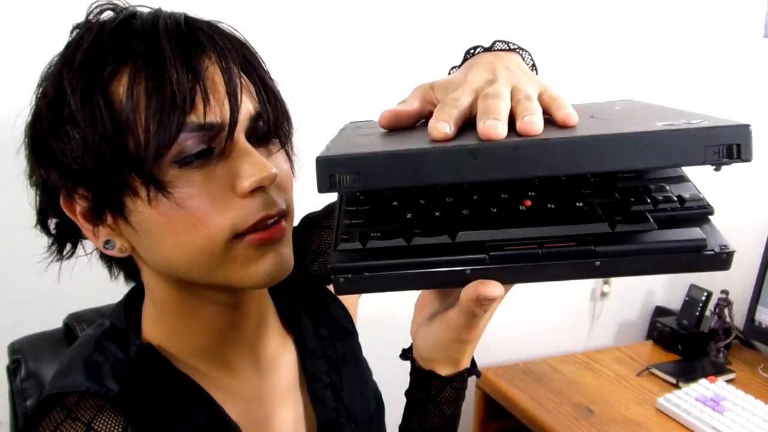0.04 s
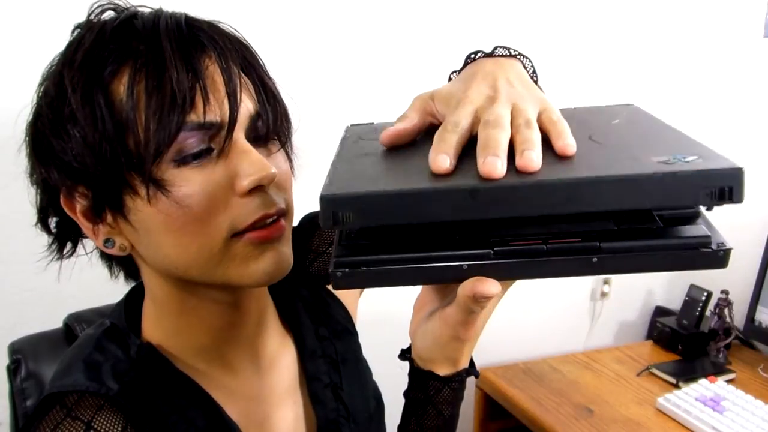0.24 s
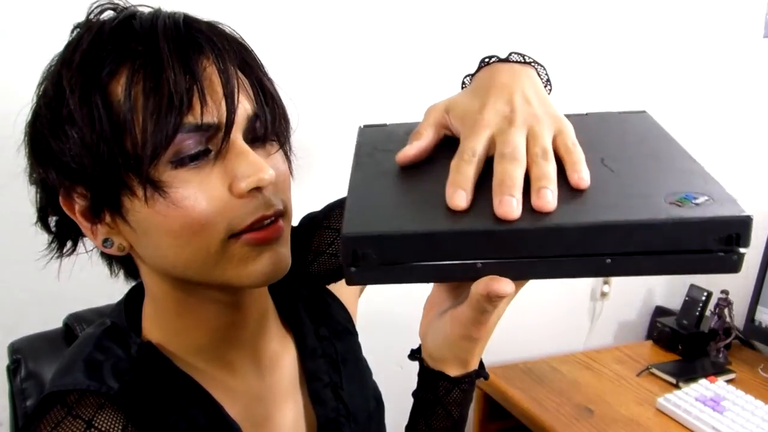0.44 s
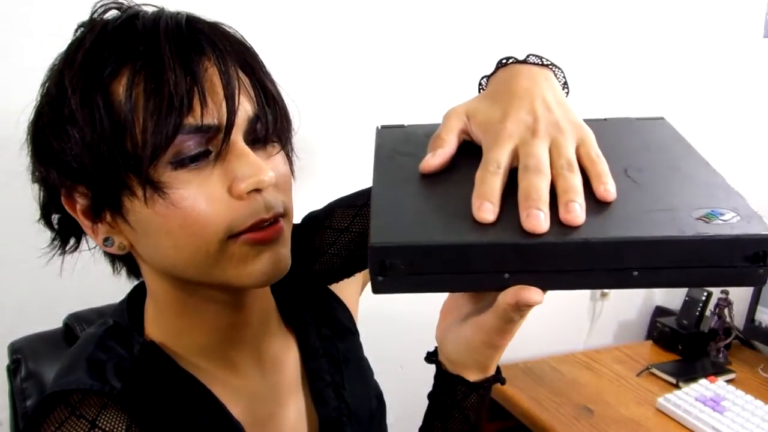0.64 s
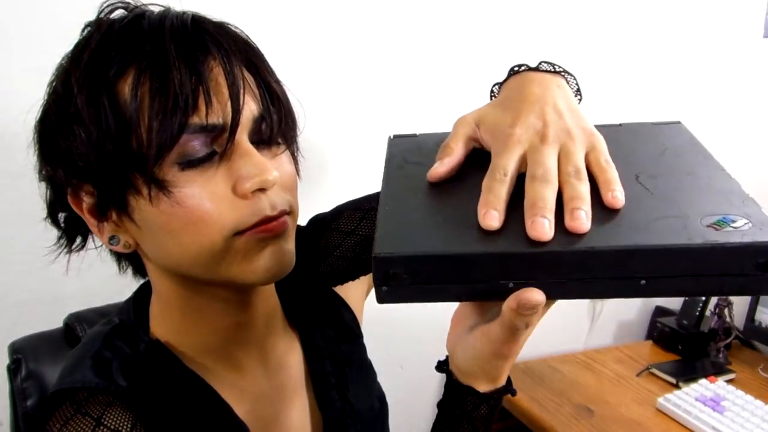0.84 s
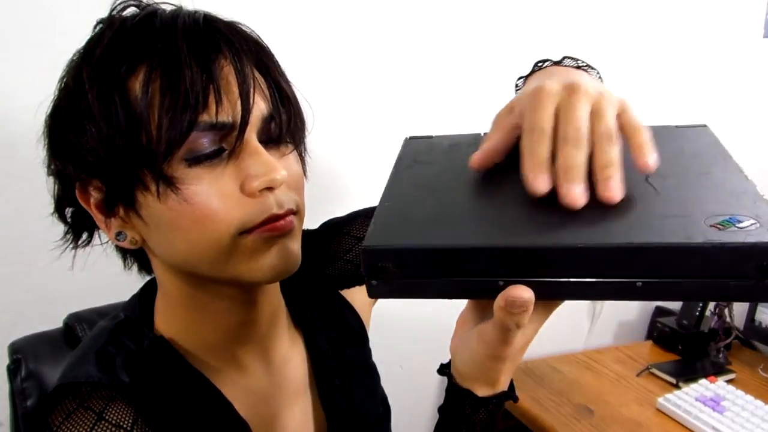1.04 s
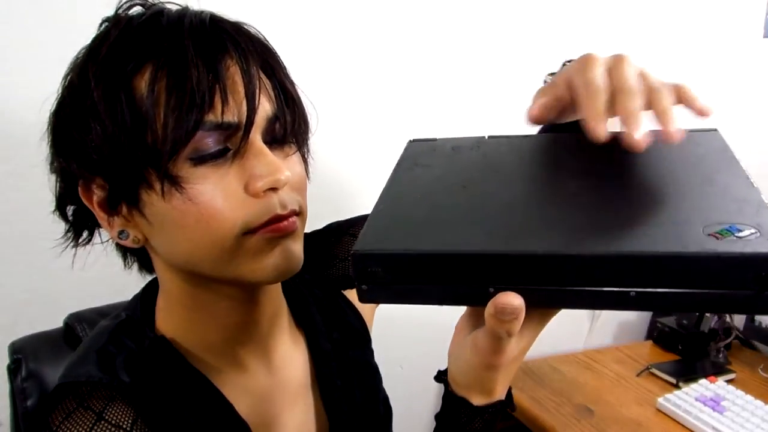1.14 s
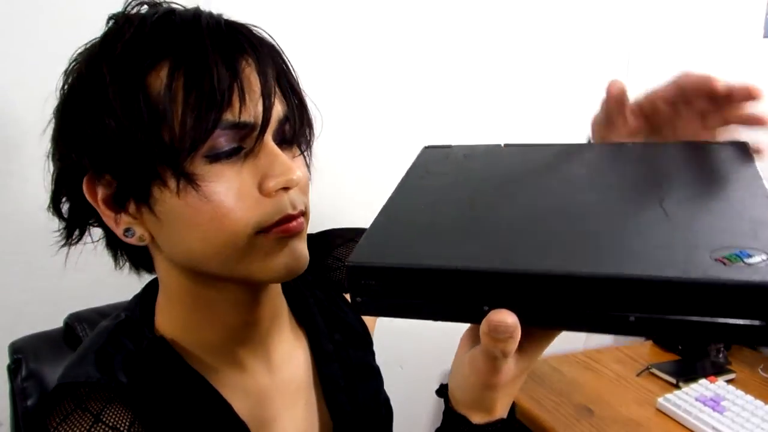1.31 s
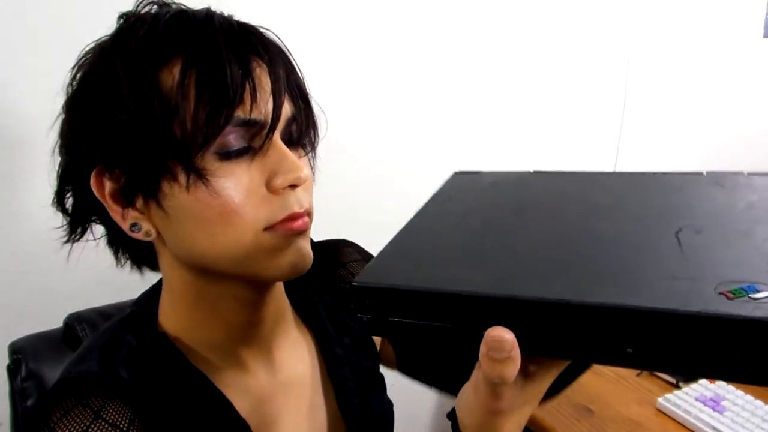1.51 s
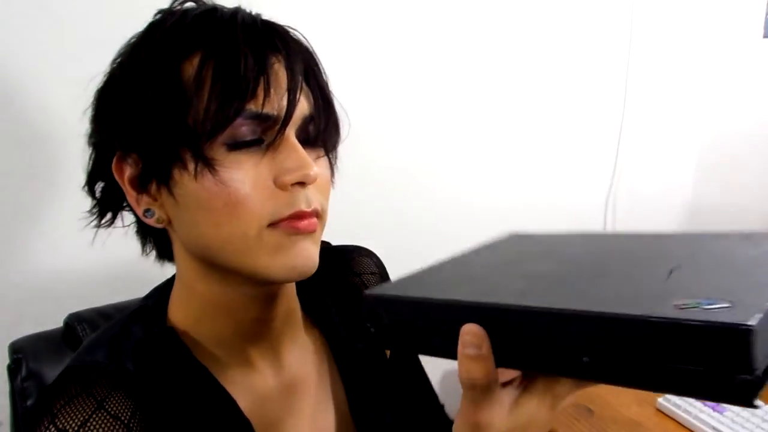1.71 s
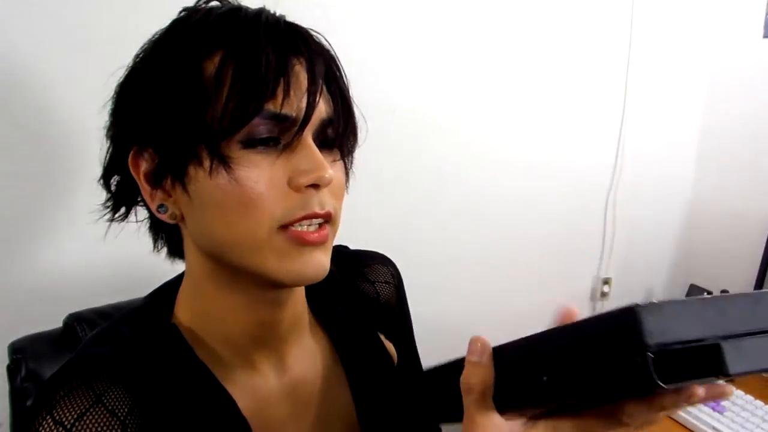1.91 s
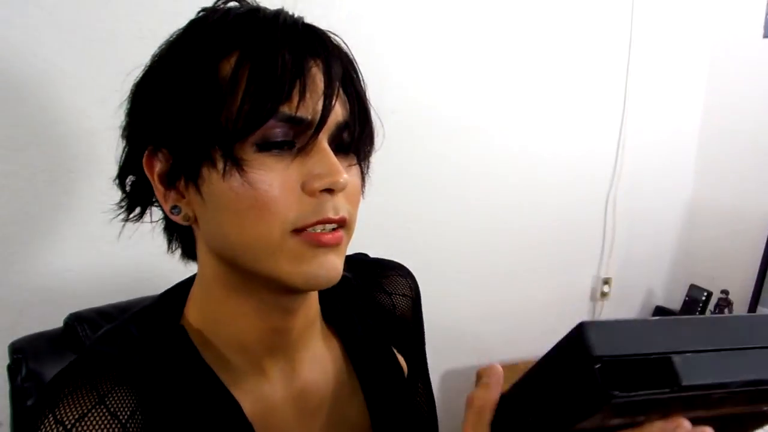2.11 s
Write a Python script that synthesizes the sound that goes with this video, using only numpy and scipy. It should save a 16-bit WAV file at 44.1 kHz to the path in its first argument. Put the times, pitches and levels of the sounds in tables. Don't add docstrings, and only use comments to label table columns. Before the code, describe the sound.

An old laptop closes close to the microphone: a soft plastic slide, three hard clusters of latch clicks, then quiet creaks, small knocks and a loose rattle as it is lowered in a small bare room.

```python
import sys
import numpy as np
from scipy import signal
from scipy.fft import rfft, irfft
from scipy.io import wavfile

SR = 44100
rng = np.random.default_rng(int(sys.argv[2]) if len(sys.argv) > 2 else 0)


def natural_amplitude(level_db):
    exponent = np.asarray(level_db, float) / 20
    return 10 ** exponent


def unload_audio(sound):
    columns = np.transpose(np.atleast_2d(sound))
    steps = np.round(np.clip(columns, -1, 1) * 32767)
    wavfile.write(sys.argv[1], SR, steps.astype(np.int16))


N = 94991

# frequency in Hz, level in dB, t60 in seconds.
SHELL = [(858, 1.5, 0.016), (1022, -4.5, 0.033), (1030, -3.5, 0.025), (1130, -2.5, 0.026),
         (1171.4, 1.5, 0.013), (1258, 3, 0.018), (1306, -6, 0.003), (1590, -10, 0.0067), (1797, -8, .012),
         (1922, -12, 0.0078), (1970, -7, 0.0053), (2316, -8.5, 0.0095), (2720, -7.5, 0.006),
         (3056, -10, 0.0091)]
# frequency in Hz, level in dB, t60 in seconds.
PANEL = [(306.8, -24, 0.079), (507.6, -18.5, 0.0042), (577, -2, 0.12), (623, 0, 0.04), (705, 3.5, 0.026),
         (743, -8.5, 0.011)]
# frequency in Hz, level in dB per Hz.
FLOOR = [(59, -36), (100, -6.5), (260, -6), (1170, -8.5), (2000, -11), (3050, -10.5), (4020, -15),
         (6560, -13), (16000, -14)]
SHELL_LOW_HZ, PANEL_LOW_HZ = 856, 407


def rms_one(x):
    return x / np.sqrt(np.mean(x ** 2) + 1e-20)


def in_time(rows):
    s, db = np.transpose(rows)
    after_db = db[-1] if s[-1] > 2.1 else -120
    return natural_amplitude(np.interp(np.arange(N) / SR, s, db, left=-120, right=after_db))


def at_hz(points, hz, column=1):
    points = np.array(points)
    return np.interp(np.log(hz + 1), np.log(points[:, 0]), points[:, column])


def shape(spectrum, size):
    hz = np.arange(size // 2 + 1) * SR / size
    inside = (hz > .7 * spectrum[0][0]) * (hz < 1.3 * spectrum[-1][0])
    return natural_amplitude(at_hz(spectrum, hz)) * inside


def coloured(spectrum):
    return rms_one(irfft(rfft(rng.standard_normal(N)) * shape(spectrum, N), N))


def wide(spectrum, side_db):
    return coloured(spectrum) + natural_amplitude(side_db) * coloured(spectrum) * [[1], [-1]]


def lumpy(rate, spread_db):
    knots = rng.standard_normal(400)
    return natural_amplitude(spread_db * np.interp(np.arange(N) / SR * rate, np.arange(400), knots))


def impulses(s, db):
    clicks = np.full(N, 1e-18)
    clicks[(np.array(s) * SR).astype(int)] = natural_amplitude(db)
    return clicks


def struck(modes, s, db, scatter_db):
    out = np.zeros(N)
    draw = rng.standard_normal((len(s), len(modes)))
    for k, (hz, level_db, t60) in enumerate(modes):
        clicks = impulses(s, np.array(db) + level_db + scatter_db * draw[:, k])
        r = natural_amplitude(-60 / (t60 * SR))
        w = 2 * np.pi * hz / SR
        out += signal.lfilter([0, np.sin(w)], [1, -2 * r * np.cos(w), r * r], clicks)
    return out


def radiated(x, low_hz):
    too_small = signal.butter(4, low_hz, "high", fs=SR, output="sos")
    soft_contact = signal.butter(2, 2800, fs=SR, output="sos")
    return signal.sosfilt(np.vstack([too_small, soft_contact]), x)


def burst(spectrum, s, db, t60, side_db=-28):
    clicks = impulses(s, db)
    decay = signal.lfilter([1], [1, -natural_amplitude(-60 / (t60 * SR))], clicks)
    send = irfft(rfft(clicks) * rms_one(shape(spectrum, N)), N)
    return wide(spectrum, side_db) * decay, send


def quiet_floor():
    return natural_amplitude(-70) * wide(FLOOR, side_db=-8.5)


def rumble():
    # time in seconds, level in dB.
    air_level = [(0, -62), (.12, -68), (.38, -72), (.47, -54), (.54, -43.5), (.61, -63.5), (.87, -67),
                 (1.09, -77.5), (1.29, -80), (1.75, -70.5), (1.95, -54.5), (2.0, -53), (2.08, -50.5),
                 (2.15, -54.5)]
    # frequency in Hz, level in dB per Hz.
    air_colour = [(12, -26), (20, 3.5), (39, -13), (146, -20.5), (194, -26.5), (250, -23.5), (320, -59),
                  (550, -120)]
    return in_time(air_level) * wide(air_colour, side_db=-26) * lumpy(15, 2.5)


def room(x):
    # frequency in Hz, t60 in seconds, level in dB, side level in dB.
    tail_bands = [(200, 0.083, -14, -26), (535, 0.26, -8.5, -39.5), (860, 0.21, -5, -43.5),
                  (1080, 0.33, -6, -39.5), (1300, 0.43, -3.5, -39), (1800, .27, -3, -28.5),
                  (2500, 0.26, 1, -21), (4926, 0.41, -2.5, -15), (9100, 0.32, -5, -14.5),
                  (14820, 0.17, -0.5, -18)]
    delay_s, early_db, early_t60_s = 0.0019, 0.5, 0.059
    knee_s, drop_db_per_s = 0.11, 118
    size = SR // 2
    t, tail = np.arange(size) / SR, 0
    edges = 125 * 2 ** np.arange(0, 7.1, 1 / 3)
    for low, high in zip(edges, edges[1:]):
        hz = np.sqrt(low * high)
        sos = signal.butter(2, [low, high], "band", fs=SR, output="sos")
        band = signal.sosfilt(sos, rng.standard_normal((2, size)))
        late = natural_amplitude(-60 * t / at_hz(tail_bands, hz))
        early = natural_amplitude(early_db - 60 * t / early_t60_s)
        level = natural_amplitude(at_hz(tail_bands, hz, column=2))
        side = natural_amplitude(at_hz(tail_bands, hz, column=3))
        tail = tail + band * (late + early) * level * [[1], [side]]
    onset = np.clip(t / delay_s, 0, 1) ** 2
    tail = tail * onset * natural_amplitude(-30 - drop_db_per_s * np.clip(t - knee_s, 0, 1))
    mid, side = signal.fftconvolve(x[None], tail, axes=1)[:, :N]
    return mid + side * [[1], [-1]]


def moving_room(x):
    moves_s = [0, .7, .95, 1.5, 9]
    t = np.arange(N) / SR
    return sum(room(x * (t >= a) * (t < b)) for a, b in zip(moves_s, moves_s[1:]))


def keyboard_slide():
    # time in seconds, level in dB.
    slide_level = [(0, -65.5), (.04, -77), (.08, -71.5), (.125, -58.5), (.15, -58), (.205, -49.5),
                   (.232, -56), (.28, -61), (.36, -77)]
    # frequency in Hz, level in dB per Hz.
    slide_colour = [(450, -19), (1050, 2), (1550, -6.5), (2020, -3.5), (2800, -13), (3500, -8),
                    (4700, -12.5), (5300, -24)]
    return in_time(slide_level) * coloured(slide_colour) * lumpy(70, 1.5)


def latch_drag():
    # time in seconds, level in dB.
    drag_level = [(.66, -72), (.71, -55), (.735, -56), (.744, -44), (.747, -89.5), (.86, -79.5),
                  (.92, -57.5), (.97, -55.5), (.975, -90)]
    return in_time(drag_level) * coloured(FLOOR[2:])


def hand_rub():
    # time in seconds, level in dB.
    rub_level = [(.38, -69), (.5, -57), (.56, -86.5), (1.55, -86.5), (1.62, -71.5), (1.7, -70.5),
                 (1.785, -61), (1.8, -61), (1.87, -50.5), (1.9, -54.5), (1.95, -46.5), (2.03, -49),
                 (2.08, -55), (2.15, -50)]
    # frequency in Hz, level in dB per Hz.
    rub_colour = [(120, -47.5), (200, -22), (683, 3), (791, -11), (1120, 2), (1560, -6), (6170, -12),
                  (8270, -11.5), (16000, -18.5)]
    return in_time(rub_level) * coloured(rub_colour) * lumpy(90, 2.2)


def finger_rustle():
    # time in seconds, level in dB.
    rustle_level = [(1.56, -85), (1.615, -71.5), (1.625, -66), (1.66, -72), (1.7, -85)]
    # frequency in Hz, level in dB per Hz.
    rustle_colour = [(1000, -12), (1300, 0), (2100, 0), (2600, -14.5)]
    return in_time(rustle_level) * coloured(rustle_colour) * lumpy(120, 3.0)


def puffs():
    # start in seconds, level in dB, length in seconds.
    pushes = [
        (0.485, -44, .04),
        (0.513, -31, .012),
        (0.516, -33, .005),
        (0.7445, -35, .012),
        (0.746, -32, .005),
        (0.977, -46, .004),
    ]
    out, t = np.zeros(N), np.arange(N) / SR
    for s, db, length in pushes:
        u = np.clip((t - s) / length, 0, 9)
        out += natural_amplitude(db) * np.sin(2 * np.pi * u) * np.exp(-1.5 * u)
    return out


def creak():
    # time in seconds, level in dB.
    creak_level = [(1.79, -68.5), (1.8, -62), (1.82, -48.5), (1.86, -40), (1.885, -50), (1.92, -89),
                   (1.99, -53), (2.03, -45.5), (2.07, -72), (2.15, -50)]
    # frequency in Hz, level in dB, t60 in seconds.
    edge = [(2360, -5.5, 0.017), (1900, -11, 0.0089), (3115, -12, 0.0072)]
    slips_per_s, panel_db = 470, -8.5
    s = np.flatnonzero(rng.random(N) < slips_per_s / SR) / SR
    db = 2.1 * rng.exponential(1, len(s))
    shell = struck([*SHELL, *edge], s, db, scatter_db=9.5)
    panel = struck(PANEL[2:], s, db + panel_db, scatter_db=9.5)
    return in_time(creak_level) * rms_one(radiated(shell + panel, PANEL_LOW_HZ))


def rattle():
    # time in seconds, level in dB.
    bounces = [(1.948, -26), (1.9512, -25), (1.953, -25.5), (1.957, -30), (1.96, -27.5), (1.963, -37),
               (1.969, -33.5), (1.972, -32.5)]
    # frequency in Hz, level in dB per Hz.
    part_colour = [(2500, -21.5), (3800, -13.5), (4500, -1), (5300, -0.5), (6200, -19.5), (7200, -12.5),
                   (9000, -7.5), (11000, -22.5), (16000, -16.5)]
    s, db = np.transpose(bounces)
    direct, send = burst(part_colour, s, db, t60=.02)
    return direct, natural_amplitude(9) * send


def case_hits():
    # time in seconds, then shell, deep panel, crack and
    # sparkle levels in dB.
    snaps = [(.436, -59.5, -51, -78, -68), (.5057, -23, -54, -32, -30.5),
             (.5072, -15.5, -24.5, -37.5, -43.5), (.5132, -15, -14, -27.5, -40),
             (.5159, -10, -11, -17.5, -31), (.5185, -23, -32.5, -31.5, -27.5), (.5235, -26, -23, -33, -34),
             (.532, -16.5, -41.5, -43.5, -50), (.538, -31, -34, -37, -47), (.554, -32, -32.5, -39.5, -54.5),
             (.617, -31, -56, -61.5, -66.5), (.7432, -23.5, -46, -38.5, -42), (.7452, -5, -17.5, -9.5, -10),
             (.757, -27, -33, -26.5, -30), (.7705, -20.5, -26, -40.5, -48), (.786, -21, -43, -38.5, -44),
             (.9728, -26, -30, -40, -64), (.9772, -13, -14.5, -25.5, -35.5), (.991, -28, -25, -52, -60.5)]
    # (seconds, then four levels in dB).
    knocks = [(1.62, -67, -75, -78, -82), (1.793, -30, -42, -48.5, -65), (1.836, -37, -39, -58.5, -70),
              (1.857, -38, -42, -60.5, -50.5), (1.8685, -25, -31, -43.5, -47.5),
              (1.911, -55, -65, -72.5, -51), (1.971, -34.5, -39.5, -56, -61), (2.015, -43, -64, -60, -70),
              (2.028, -28.5, -60, -51, -67), (2.052, -30.5, -51, -45.5, -72), (2.127, -57, -57, -59, -60.5)]
    # (seconds, then four levels in dB).
    more_contacts = [(.5118, -25.5, -30.5, -45.5, -55), (.5142, -11.5, -50, -28.5, -44.5),
                     (.5395, -23, -45, -37, -56), (.741, -57, -39, -47.5, -44.5),
                     (.7465, -24.5, -20.5, -20.5, -16.5), (.7515, -41, -30, -26, -25.5),
                     (.7605, -41, -51, -25, -30), (.7645, -42, -34, -31.5, -31), (.792, -35, -45, -44, -51),
                     (.8, -26, -48.5, -45, -50), (1.785, -44, -77, -78, -80), (1.809, -51.5, -65, -67, -75),
                     (1.82, -31.5, -47.5, -61, -75), (1.825, -34, -58, -59, -75), (1.842, -58, -44.5, -59, -75),
                     (1.847, -50, -62, -61.5, -75.5), (1.875, -46, -60, -62, -70), (1.886, -38, -64, -62, -70),
                     (1.891, -55, -68, -65, -72), (1.905, -65, -68, -65.5, -70), (1.63, -59.5, -74, -74, -78.5),
                     (1.645, -59.5, -74.5, -68.5, -84), (2.04, -40, -51, -60.5, -70.5)]
    # frequency in Hz, level in dB per Hz.
    crack_colour = [(2000, 1.5), (2800, -7), (4240, 1), (6000, -7.5), (7500, -5.5)]
    # frequency in Hz, level in dB per Hz.
    sparkle_colour = [(6000, -6), (7500, 1), (9500, -4), (12000, -6.5), (16000, -8)]
    s, shell_db, panel_db, crack_db, sparkle_db = np.transpose([*snaps, *knocks, *more_contacts])
    shell = radiated(struck(SHELL, s, shell_db - 11.5, scatter_db=5.0), SHELL_LOW_HZ)
    panel = radiated(struck(PANEL, s, panel_db - 7.5, scatter_db=3.0), PANEL_LOW_HZ)
    ring = shell + panel
    crack, crack_send = burst(crack_colour, s, crack_db + 5.5, t60=0.0062)
    sparkle, sparkle_send = burst(sparkle_colour, s, sparkle_db + 5, t60=.007)
    send = ring + natural_amplitude(2.5) * crack_send + natural_amplitude(8) * sparkle_send
    return ring + crack + sparkle, send


def scene():
    background = quiet_floor() + rumble()
    friction = keyboard_slide() + latch_drag() + hand_rub() + finger_rustle()
    loose_part, part_send = rattle()
    hits, hit_send = case_hits()
    reflections = moving_room(hit_send + part_send)
    return background + friction + puffs() + creak() + loose_part + hits + reflections


def low_pass(x):
    return signal.sosfilt(signal.butter(12, 16100, fs=SR, output="sos"), x)


def record(dry):
    rounded = .98 * np.tanh(dry / .98)
    top_cut = signal.cheby2(12, 70, 16700, fs=SR, output="sos")
    return low_pass(signal.sosfilt(top_cut, rounded))


dry = scene()
out = record(dry)
unload_audio(out)
```